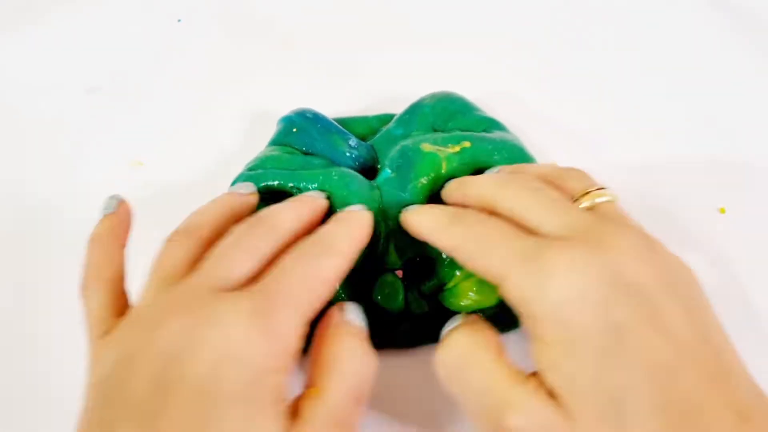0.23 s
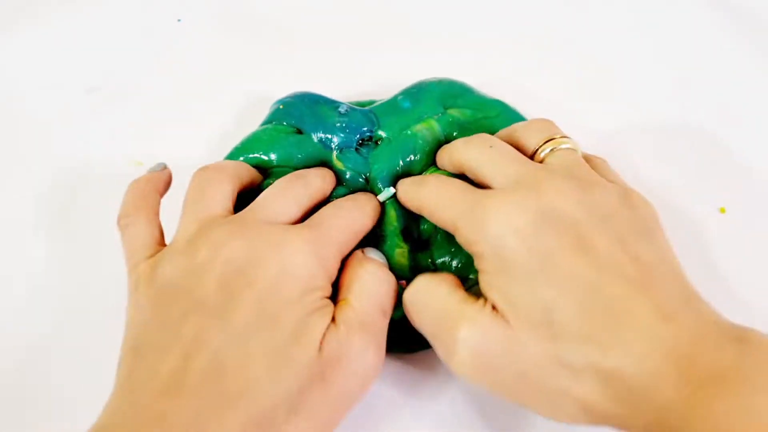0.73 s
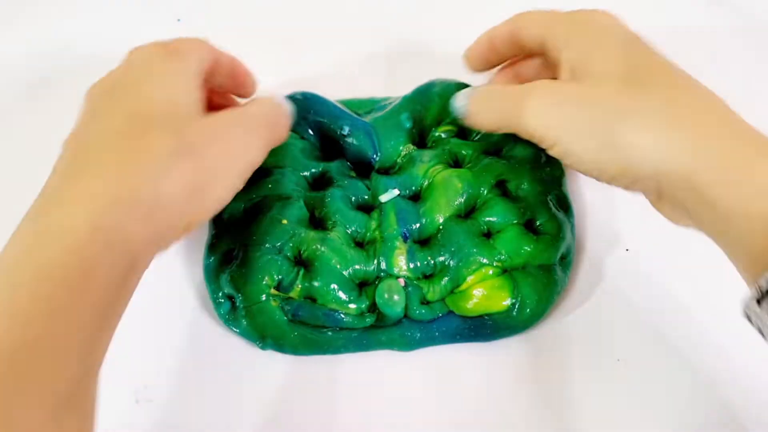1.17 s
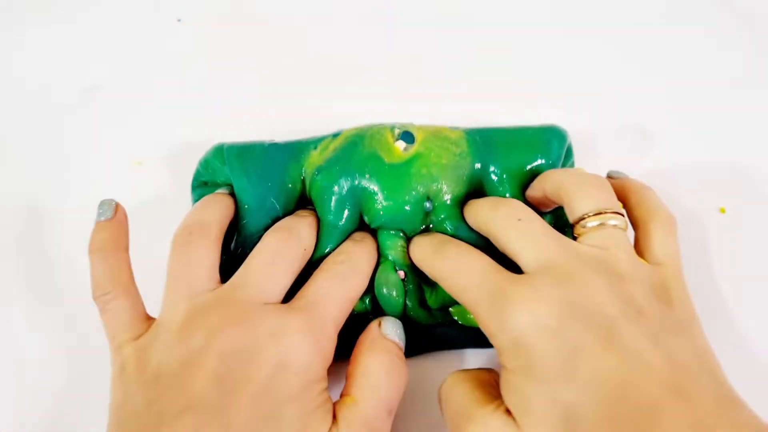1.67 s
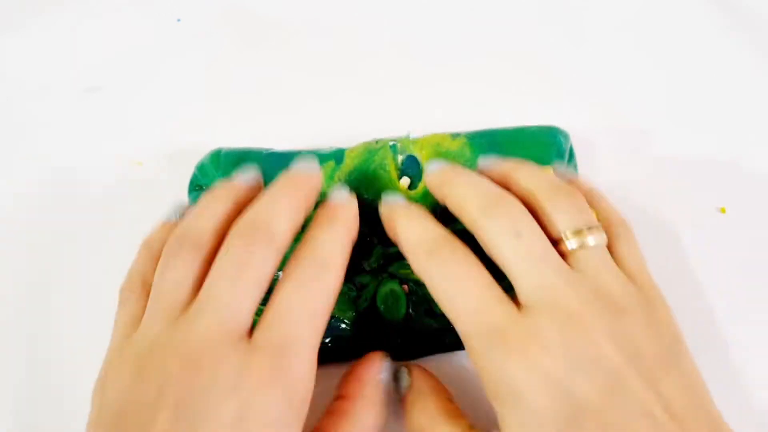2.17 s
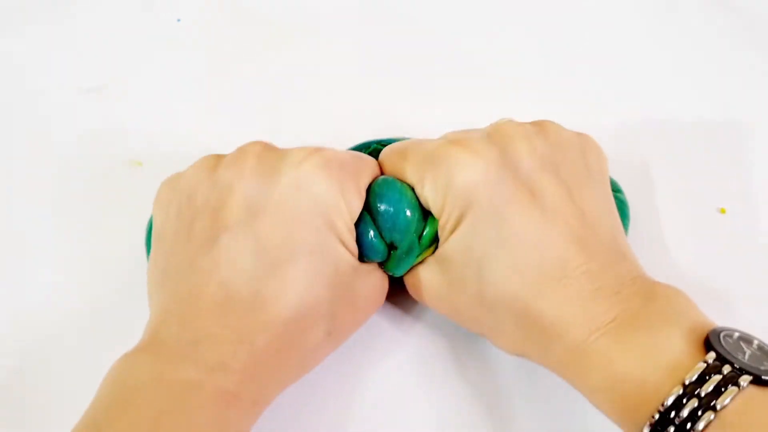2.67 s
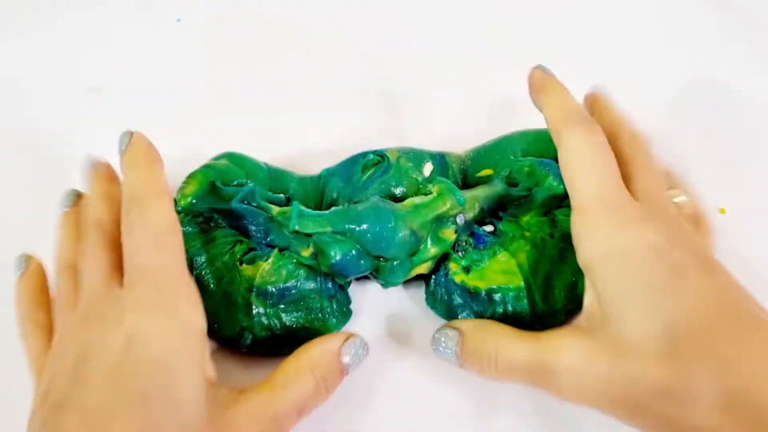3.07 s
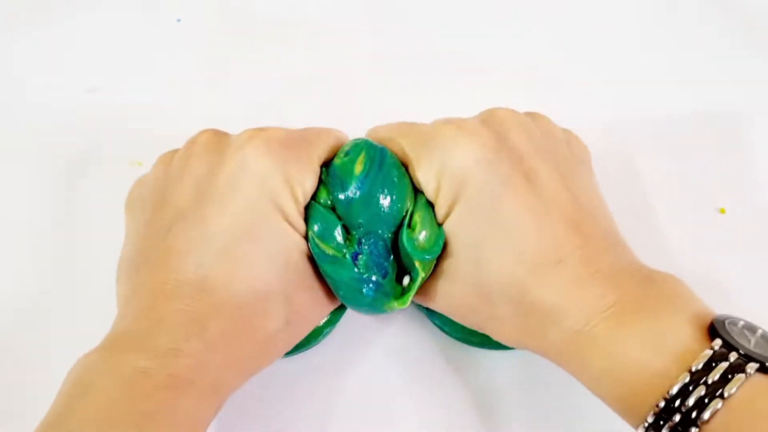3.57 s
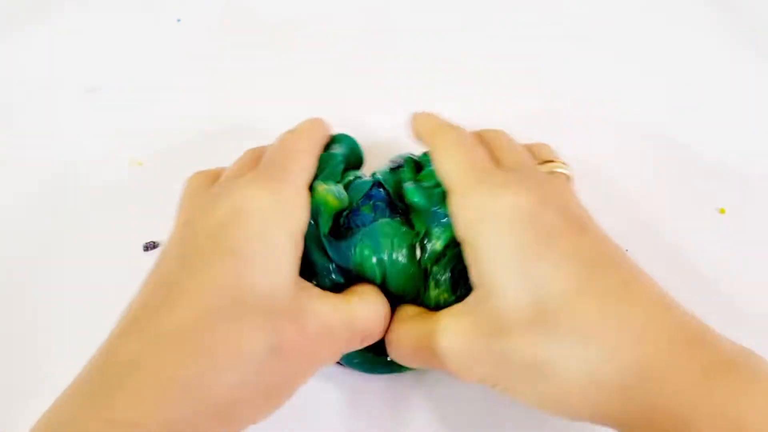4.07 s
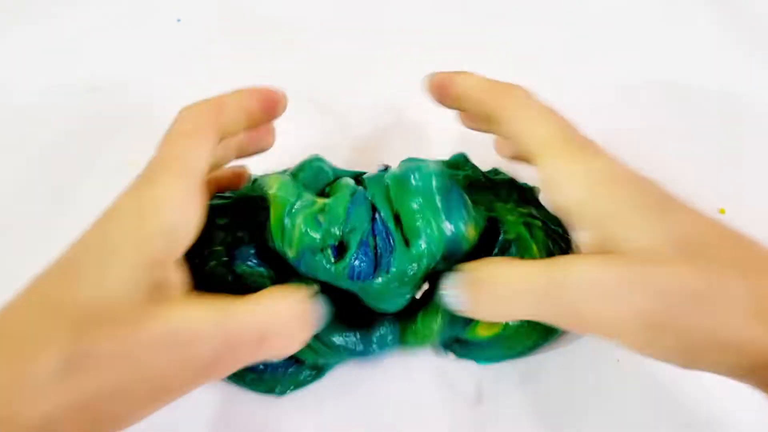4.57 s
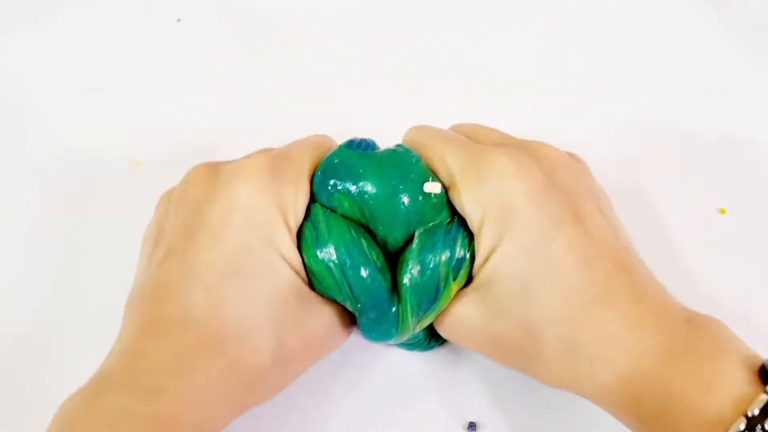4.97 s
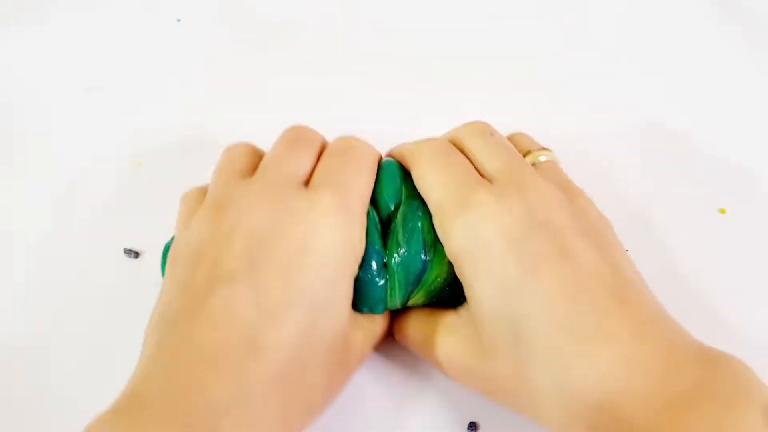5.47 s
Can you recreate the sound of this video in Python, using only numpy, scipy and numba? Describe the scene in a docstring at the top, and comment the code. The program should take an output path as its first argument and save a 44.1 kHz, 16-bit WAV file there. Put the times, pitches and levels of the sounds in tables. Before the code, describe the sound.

Hands poke, fold and squeeze wet slime up close, with isolated squelchy pops at first, then dense bursts of sharp crackles and snaps.

```python
"""Wet slime poked, folded and squeezed by two hands: swarms of short ringing bubbles follow the air flow of each stroke.
Thin films snap as filtered noise bursts; larger air pockets pop as damped, wobbling tones.
Pushes of the hands thud into the table as low damped sines.
The table and the space above it colour the crackle; a small, dry room adds short reflections and a faint hush."""
import sys
import numpy as np
from scipy import signal
from scipy.fft import rfft, irfft
from scipy.io import wavfile
from scipy.ndimage import uniform_filter1d, map_coordinates
from numba import njit

SR = 44100
rng = np.random.default_rng(int(sys.argv[2]) if len(sys.argv) > 2 else 0)


def bounce(signal):
    """Save signal as a 16-bit WAV file at the path given by the first command-line argument."""
    frames = np.transpose(np.atleast_2d(signal))
    limited = np.clip(frames, -1, 1)
    pcm = np.round(limited * 32767).astype(np.int16)
    wavfile.write(sys.argv[1], SR, pcm)


N = 251811
TIME = np.arange(N) / SR


def amp(db):
    """Decibels to gain."""
    return 10 ** (np.asarray(db) / 20)


def unit(x):
    """Scale to an rms of 1."""
    return x / np.sqrt(np.mean(x ** 2) + 1e-18)


def add(track, start_s, sound):
    """Mix a sound into the track."""
    i = int(np.clip(start_s * SR, 0, N - 1))
    track[i:i + len(sound)] += sound[:N - i]


def resonate(x, hz, width_hz):
    """One resonance, gain 1 at its centre."""
    return signal.lfilter(*signal.iirpeak(hz, hz / width_hz, fs=SR), x)


def colour(x, points):
    """Shape a spectrum by (Hz, dB) points, interpolated over log frequency."""
    hz, db = np.transpose(points)
    f = np.maximum(np.fft.rfftfreq(len(x), 1 / SR), 1)
    return irfft(rfft(x) * amp(np.interp(np.log(f), np.log(hz), db)), len(x))


# spectrum of the still room: hz, relative_level_db
HUSH_SPECTRUM = [(18, -29.5), (30, -4.5), (185, -1), (312, -10.5), (3150, -19), (5440, -4), (13900, -7.5),
                 (15000, -8)]


def hush(rms_db=-81.5):
    """Still room: steady coloured noise."""
    return amp(rms_db) * unit(colour(rng.standard_normal(N), HUSH_SPECTRUM))


def room(x, level_db=-13.5, t60_low_s=0.11, t60_high_s=0.07, split_hz=1500):
    """Dense, short reflections; the treble dies first."""
    t = TIME[:12000]
    noise = rng.standard_normal(len(t))
    low = signal.sosfilt(signal.butter(2, split_hz, fs=SR, output="sos"), noise)
    high = signal.sosfilt(signal.butter(2, split_hz, "high", fs=SR, output="sos"), noise)
    tail = low * amp(-60 * t / t60_low_s) - high * amp(-60 * t / t60_high_s)
    tail = tail * (t > .002)
    tail = tail / np.sqrt(np.sum(tail ** 2))
    return x + amp(level_db) * signal.fftconvolve(x, tail)[:N]


# fixed resonances of the table and the space above it: centre_hz, width_hz, level_db (before gain_db)
SPACE_MODES = [(244, 40, 3), (305, 60, -4), (695, 100, -3), (880, 90, -8), (1425, 160, -8), (3560, 450, -9),
               (6360, 900, -7), (8340, 600, -4), (13800, 2500, -7)]


def table_space(x, direct_db=-2.5, gain_db=2.0):
    """The crackle rings fixed resonances of the table and the space above it."""
    rings = sum(amp(db + gain_db) * resonate(x, hz, width_hz) for hz, width_hz, db in SPACE_MODES)
    return amp(direct_db) * x + rings


# every poke bottoms out this long after its start: a cavity and a deep pocket pop, the table thuds
BOTTOM_S = .025
# thud of each poke; level relative to its gurgle, before gain_db; length before stretch
TABLE_HZ, TABLE_DB, TABLE_S = 125, 7, 0.034
# hands pressing on the table: start_s, level_db (before gain_db), pitch_hz, length_s (before stretch)
TABLE_THUDS = [(0.23, -24.5, 41.8, 0.046), (0.266, -20, 56, 0.0077), (0.533, -21, 42.3, 0.064),
               (0.845, -26, 91, 0.051), (0.992, -22, 89, 0.014), (1.097, -20, 69, 0.028),
               (1.189, -29.5, 75, 0.014), (2.1296, -23, 44, 0.031), (3.136, -23, 42.5, 0.058),
               (3.7, -31, 65.5, 0.14), (3.811, -21.5, 72.9, 0.014), (4.0674, -22, 63.4, 0.019),
               (4.361, -32.5, 63, .028), (4.524, -22, 46.4, .032), (4.535, -22.5, 116, 0.043),
               (5.224, -30, 61.1, 0.056), (5.306, -29, 63, 0.034)]


def thuds(gain_db=-2, stretch=0.82, lead_s=.004):
    """A soft push rocks the table briefly, until the hands damp it."""
    out, t = np.zeros(N), TIME[:16384]
    pokes = [(start_s + BOTTOM_S, db + gurgle_db + TABLE_DB, TABLE_HZ, TABLE_S)
             for start_s, _, db, _, gurgle_db, *_ in POKES]
    for start_s, db, hz, length_s in pokes + TABLE_THUDS:
        age = t / (stretch * length_s / 2)
        envelope = age * np.exp((1 - age ** 2) / 2)  # peak 1 at age 1
        add(out, start_s - lead_s, amp(db + gain_db) * envelope * np.sin(2 * np.pi * hz * t))
    return out


# pops of each poke; pocket level relative to its gurgle, before gain_db; lengths before stretch
CAVITY_POP_S = .014
POCKET_HZ, POCKET_DB, POCKET_S = 232.1, 10, .018
# air pockets popping: start_s, level_db (before gain_db), pitch_hz (before glide and wobble),
# length_s (before stretch)
POCKET_POPS = [(0.4883, 0, 190, 0.0061), (1.0017, -9, 181, 0.0056), (1.961, -28, 359, 0.037),
               (1.982, -15, 269, 0.0076), (2.487, -13.5, 698, .017), (2.51, -16.5, 239, 0.02),
               (2.5575, -11.5, 768, 0.0098), (2.62, -23, 706, 0.016), (2.694, -13.5, 754, 0.0068),
               (2.778, -22, 1316, 0.0025), (2.786, -18, 827, 0.015), (2.833, -7.5, 1010, 0.0071),
               (2.856, -6.5, 292, 0.0091), (3.176, -22, 136, 0.016), (3.463, -22, 712, 0.018),
               (3.6485, -24.5, 735, 0.015), (3.705, -13.5, 824, 0.0033), (3.6704, -12.5, 1485, 0.0045),
               (3.6768, -16, 246, 0.0064), (3.729, -14, 249.4, 0.014), (3.7324, -15.5, 1240, 0.013),
               (4.0875, -9.5, 920, 0.0014), (4.13, -6, 542, 0.011), (4.1385, 3.5, 543, .0035),
               (4.1862, 1.5, 545, 0.0022), (4.201, -21.5, 1700, 0.005), (4.2563, -23, 240, 0.019),
               (4.4487, -5.5, 820, 0.0045), (4.503, -15, 240, 0.014), (4.9004, -12, 368, .01),
               (4.9277, -3.5, 1040, 0.002), (5.1847, -4.5, 850, 0.0076), (5.1988, -12.5, 230.5, 0.015),
               (5.5336, -4, 1340, 0.0011), (5.5657, -24, 688, 0.045), (5.591, -15, 857, 0.0072),
               (5.648, -21, 920, .0092)]


def pops(gain_db=-3, stretch=0.97, glide=0.014, overtone=1.47, overtone_db=-10):
    """An air pocket opens within a cycle and rings down; its soft wall wobbles the pitch and adds a second mode."""
    out, t = np.zeros(N), TIME[:8192]
    holes = [(start_s + BOTTOM_S, pop_db, cavity_hz, CAVITY_POP_S)
             for start_s, *_, pop_db, cavity_hz in POKES]
    pockets = [(start_s + BOTTOM_S, db + gurgle_db + POCKET_DB, POCKET_HZ, POCKET_S)
               for start_s, _, db, _, gurgle_db, *_ in POKES]
    for start_s, db, hz, length_s in holes + pockets + POCKET_POPS:
        age = t / (stretch * length_s)
        knots = rng.standard_normal(256)
        wobble = .08 * np.interp(t * hz / 2, np.arange(len(knots)), knots)  # a knot every two cycles
        turns = np.cumsum(hz * (1 + wobble + glide * (np.tanh(age) - .5))) / SR
        second = overtone * (1 + 0.11 * rng.standard_normal())
        ring = np.sin(2 * np.pi * turns)
        ring = ring + amp(overtone_db) * np.sin(2 * np.pi * second * turns)
        opening = 1 - np.exp(-turns / .5)
        add(out, start_s, amp(db + gain_db) * ring * opening * np.exp(-age ** 2))
    return out


# films snapping: start_s, level_db (before ring_db, tick_db), ring_hz, length_s (before stretch),
# bright_db (cut of the tick's spectrum up to 3.5 kHz)
FILM_SNAPS = [(0.1244, -17, 14300, 0.0047, 1), (0.353, -41.5, 6050, 0.00077, 15.5),
              (0.48, -17, 12500, 0.00059, 15), (0.809, -17.5, 6720, 0.0012, -14),
              (0.909, -47, 5970, 0.0064, 13), (0.951, -36, 14000, 0.0027, 11),
              (1.065, -25, 10000, 0.0087, -10), (1.0766, -19.5, 2850, 0.003, 0.5),
              (1.162, -26.5, 2740, 0.0019, -8.5), (1.221, -46, 3750, .0039, -13),
              (1.284, -46, 6300, 0.0026, -25), (1.3354, -42, 14220, 0.0043, 9),
              (1.761, -16, 13450, .0021, 0), (1.773, -17.5, 2460, 0.002, 2.5),
              (1.976, -49, 3000, 0.0066, 7.5), (2.075, -15, 13100, 0.0025, 1.5),
              (2.301, -45.5, 3500, 0.0053, -6), (2.3323, -22.5, 14100, 0.0011, 22),
              (2.376, -48, 13135, .0023, 6), (2.4077, -27, 7300, 0.0065, 49), (2.487, -22, 7000, .0027, 29),
              (2.513, -14, 6170, 0.0023, 40), (2.523, -18, 3820, 0.0012, -14),
              (2.5564, -9, 6460, 0.0011, -21), (2.619, -22.5, 12400, 0.0056, 12.5),
              (2.628, -20.5, 8250, .0025, 9), (2.6584, -10, 13600, 0.0027, 11),
              (2.721, -23.5, 1900, 0.0032, -8), (2.8294, -17, 3250, .0052, 25),
              (2.868, -34, 3680, .0019, -3.5), (2.8877, -27, 2980, 0.0092, 12.5),
              (3.296, -10.5, 6180, 0.00091, -38), (3.305, -14, 2470, 0.0026, -12),
              (3.363, -30, 14200, 0.0022, 21), (3.379, -15.5, 3350, 0.0072, -7),
              (3.408, -12, 6460, 0.00022, 0), (3.429, -19.5, 2380, 0.0032, 9.5),
              (3.4585, -22.5, 8160, 0.012, 5), (3.555, -22, 6300, 0.0031, -14),
              (3.857, -50.5, 3440, 0.0054, -2), (4.1845, -10, 3120, 0.0015, -3),
              (4.2369, -12, 15100, 0.0036, 0.5), (4.3206, -17, 12500, 0.0083, -10),
              (4.3292, -16, 2680, 0.0042, -11), (4.432, -15, 3220, 0.00085, -12),
              (4.438, -19, 6730, .0011, 4), (4.463, -27.5, 6500, .005, 11.5),
              (4.8447, -33.5, 4450, 0.002, -10), (4.8975, -8.5, 3250, 0.0012, -14),
              (4.927, -20, 3500, 0.0015, 15), (4.9512, -9, 13600, 0.0018, 10),
              (4.9666, -23.5, 4440, 0.01, 18.5), (4.981, -16.5, 13400, .0006, 0.5),
              (5.033, -12.5, 6300, 0.0026, -20.5), (5.084, -15.5, 14900, 0.012, 16.5),
              (5.201, -25.5, 2770, 0.018, 22), (5.551, -20.5, 13500, 0.0044, 6),
              (5.568, -11, 5750, 0.0025, -30), (5.605, -15.5, 13200, 0.0014, 14),
              (5.651, -26.5, 4030, 0.0026, 27)]


def snaps(ring_db=0, tick_db=-4, stretch=0.93, sharpness=3.1, rise_s=0.00023, spray_db=-21, spray_s=0.003):
    """A film tears in a noise burst with a faint spray; it rings a little cavity and gives a broad tick."""
    out, t = np.zeros(N), TIME[:4096]
    spray = amp(spray_db) * np.exp(-t / spray_s)
    rise = 1 - np.exp(-t / rise_s)
    for start_s, db, hz, length_s, bright_db in FILM_SNAPS:
        envelope = np.exp(-t / (stretch * length_s))
        tear = rng.standard_normal(len(t)) * (envelope + spray) * rise
        ring = resonate(resonate(tear, hz, hz / sharpness), hz, hz / sharpness)
        # a thinner film gives a brighter tick; the padding gives its onset room
        padded = np.pad(tear, 64)
        tick = colour(padded, [(200, -17.5 - bright_db), (900, 0.5 - bright_db), (3500, -bright_db),
                               (10000, -4.0), (14000, -18.5)])
        size = amp(db) * np.sqrt(np.mean(envelope ** 2))
        add(out, start_s, size * amp(ring_db) * unit(ring))
        add(out, start_s - 64 / SR, size * amp(tick_db) * unit(tick))
    return out


@njit
def bubbles(start, hz, cycles, size, glide):
    """Each bubble rings for a few cycles; its pitch climbs as the cavity opens."""
    out = np.zeros(N)
    for k in range(len(start)):
        life = cycles[k] * SR / hz[k]  # samples
        phase = 0.
        for i in range(min(int(life), N - start[k])):
            phase += 2 * np.pi * hz[k] / SR * (1 + glide * i / life)
            out[start[k] + i] += size[k] * np.exp(-6 * i / life) * np.sin(phase)
    return out


def swarm(per_s, low_hz, high_hz, mean_cycles, spread_db, slope_db_per_octave):
    """Bubbles bursting at random, many faint and a few strong, up to a size limit."""
    when, pitch, life, strength, sign = rng.random((int(per_s * N / SR), 5)).T
    octave = pitch * np.log2(high_hz / low_hz)
    excess = np.minimum(-np.log(1 - strength), 3.6)
    size = np.sign(sign - .5) * amp(spread_db * excess + slope_db_per_octave * octave)
    start = (when * N).astype(np.int64)
    return bubbles(start, low_hz * 2 ** octave, mean_cycles * (.5 + life), size, .25)


def folds(x, cavity_db=9, cavity_octaves=0.52, slit_db=9, slit_octaves=0.12, slit_open_s=0.012, hollow_db=3.2):
    """Moving folds colour the crackle: a wide cavity, a narrow slit and many small passing hollows."""
    f, t, z = signal.stft(x, SR, nperseg=512, noverlap=384)
    octave = np.log2(np.maximum(f, 50))[:, None]

    def bump(centre, width):
        """A resonance around a centre given as log2 of its pitch."""
        return np.exp(-.5 * ((octave - centre) / width) ** 2)

    # each stroke gives the cavity a new shape, which holds until the next
    starts, cavity_hz = np.transpose(sorted((start_s, hz) for start_s, *_, hz in POKES + SQUEEZES))
    held = np.log2(cavity_hz)[np.maximum(np.searchsorted(starts, t) - 1, 0)]
    db = cavity_db * bump(uniform_filter1d(held, size=5), cavity_octaves)
    # each snapping film leaves a slit that rings at its pitch and closes again
    snap_s, _, slit_hz, _, _ = np.transpose(FILM_SNAPS)
    age_s = t - snap_s[:, None]
    slit_open = (age_s > 0) * np.exp(-np.abs(age_s) / slit_open_s)
    db = db + slit_db * bump(np.log2(slit_hz), slit_octaves) @ slit_open
    # hollows a third of an octave wide come and go 45 times a second
    where = np.broadcast_arrays(3 * (octave - np.log2(50)), 45 * t)
    db = db + hollow_db * map_coordinates(rng.standard_normal((32, 300)), where, order=2)
    return signal.istft(z * amp(db), SR, nperseg=512, noverlap=384)[1][:N]


def steady(x, span_s):
    """Hold the mean power at 1: the flow of air, not chance, sets the loudness of a swarm."""
    span = max(int(span_s * SR), 2)
    power = uniform_filter1d(uniform_filter1d(x ** 2, span), span)
    return x / np.sqrt(np.abs(power) + 1e-9)


def stroke(length_s, swell_db, attack_s, fall_db_per_s, tail_db, tail_db_per_s):
    """Air flow of one stroke: quick rise, swelling or sagging hold, fast fall, faint tail as the slime relaxes."""
    t = TIME[:32768]
    after_s = np.maximum(t - length_s, 0)
    held = np.minimum(t / attack_s, 1) ** 2 * amp(swell_db * np.minimum(t / length_s, 1))
    return held * (amp(-fall_db_per_s * after_s) + amp(tail_db - tail_db_per_s * after_s))


def add_flow(power, start_s, db, envelope):
    """Add the power of one stroke."""
    add(power, start_s, (amp(db) * envelope) ** 2)


# fingertips poking in: start_s, push_s, level_db (before layer gains), fizz_db and gurgle_db (relative to level_db),
# cavity_pop_db (before the pops' gain_db), cavity_hz
POKES = [(0.113, 0.037, -20.5, -3.5, 1.5, -7, 724), (0.455, 0.035, -30, 6, 8, -16.5, 740),
         (0.777, 0.036, -25.5, -0.5, 3, -16.5, 672), (1.047, 0.035, -20, 0, -3.5, -15, 1372),
         (1.733, 0.034, -22, -1, -0.5, -4.5, 692), (2.052, 0.023, -23.5, 4.5, -3, -11, 721)]
# hands gripping, folding and peeling: start_s, attack_s, length_s, level_db (before layer gains),
# swell_db (over the length), fizz_db and gurgle_db (relative to level_db), cavity_hz
SQUEEZES = [(0.0, 0.0007, 0.0096, -48, -4, 0.5, -21, 700), (0.899, 0.011, 0.13, -57.5, -1.5, -1, 5.5, 850),
            (0.983, 0.023, 0.021, -37.5, 1, -11, 0.5, 520), (1.148, 0.009, 0.17, -49, -15, 5, 10.5, 1213),
            (1.34, .01, 0.089, -79.5, -6.5, 16.5, -10, 952), (1.944, .012, 0.058, -57, 1, 1, 21.5, 517),
            (2.045, 0.0081, 0.0064, -56, -0.5, 10.5, -2, 890),
            (2.076, 0.014, 0.047, -45.5, -2, -8.5, 5, 575), (2.285, 0.048, 0.1, -59.5, -4, 5, 5, 1360),
            (2.403, 0.0077, 0.052, -41.5, -2.5, 0, 7.5, 1020),
            (2.479, 0.011, 0.036, -31.5, 4.5, 2, -7.5, 660),
            (2.541, 0.013, 0.048, -14, -12.5, -5.5, -16, 2000),
            (2.607, 0.014, 0.028, -20.5, -4.5, 0, -17.5, 1420),
            (2.663, 0.038, 0.043, -22, -3.5, -11, -3.5, 620),
            (2.773, 0.0077, 0.039, -33.5, -3.5, -30, -19, 1150),
            (2.814, 0.017, 0.05, -17, -1.5, -2, -9, 1270), (2.874, 0.0072, 0.029, -20.5, -8, -4, -2, 1280),
            (2.905, 0.043, 0.054, -35, 1.5, 3.5, 1.5, 1530), (3.124, 0.02, 0.1, -54, 15.5, -9, 0, 930),
            (3.284, 0.011, 0.077, -29.5, -17.5, 0, 1.5, 1930),
            (3.367, 0.0092, 0.081, -37.5, -2.5, 5, -3, 1850), (3.449, 0.0073, 0.025, -24, 1.5, 7, -22, 600),
            (3.482, 0.0045, 0.092, -37, -8.5, 0, -12, 1044),
            (3.634, 0.039, 0.13, -26, 1.5, -1.5, -1.5, 1410),
            (3.757, 0.0073, 0.052, -38.5, -14, 8, 7.5, 1320),
            (3.949, 0.034, 0.097, -33, -10.5, -6.5, 3, 520), (4.08, .003, 0.015, -25.5, -2.5, -27, -5, 946),
            (4.117, 0.016, 0.029, -16.5, -3, -20, -7, 555),
            (4.151, 0.0091, 0.025, -28, -2.5, -6.5, -1, 517),
            (4.178, .006, 0.04, -22, -4.5, -11.5, -7.5, 1520),
            (4.228, .005, 0.049, -28, -9, -3.5, -2, 1120), (4.279, 0.014, 0.032, -28.5, -2, -14, -10, 970),
            (4.312, 0.004, 0.057, -34, -4.5, -3, -15, 1860),
            (4.401, 0.017, 0.017, -45.5, 2.5, -4, -9.5, 816), (4.426, 0.008, 0.11, -20, -9, -2, -2, 890),
            (4.562, 0.011, 0.013, -48, -7, 13, 9, 983), (4.689, 0.021, 0.082, -46, -4.5, -3.5, -6, 653),
            (4.824, 0.041, 0.053, -44.5, 4, 5.5, 0, 534), (4.885, 0.014, 0.045, -21.5, -11, 5.5, -10, 525),
            (4.952, 0.0091, 0.096, -41, 17.5, 1.5, -4.5, 1416),
            (5.07, 0.0075, 0.1, -40, 1, -0.5, -13, 1804), (5.131, 0.013, 0.054, -27, 14, -5.5, -15, 922),
            (5.191, 0.0082, 0.039, -24.5, -10.5, 2.5, 5.5, 917), (5.28, .016, 0.18, -86, 8, -1, 25.5, 800),
            (5.457, 0.027, 0.037, -43, 0.5, -9, -4.5, 1590), (5.511, 0.019, 0.045, -41.5, 10, 0, -32, 1550),
            (5.556, 0.021, 0.044, -20, -7.5, 1, -38, 1170),
            (5.636, 0.012, 0.047, -34, -1.5, -8.5, -13, 1200)]


def flow():
    """Strength of squelch, fizz and gurgle: the powers of all strokes add, each layer with its own fall."""
    wet, fine, deep = np.zeros((3, N))
    for start_s, push_s, db, fizz_db, gurgle_db, *_ in POKES:
        add_flow(wet, start_s, db, stroke(
            push_s, 0, attack_s=0.016, fall_db_per_s=561.5, tail_db=-50, tail_db_per_s=82))
        add_flow(fine, start_s, db + fizz_db, stroke(
            push_s, 0, attack_s=0.018, fall_db_per_s=850, tail_db=-43.5, tail_db_per_s=83.5))
        add_flow(deep, start_s, db + gurgle_db, stroke(
            push_s, 0, attack_s=.018, fall_db_per_s=478, tail_db=-26.5, tail_db_per_s=129))
    for start_s, attack_s, length_s, db, swell_db, fizz_db, gurgle_db, _ in SQUEEZES:
        add_flow(wet, start_s, db, stroke(
            length_s, swell_db, attack_s, fall_db_per_s=678, tail_db=-44, tail_db_per_s=140))
        add_flow(fine, start_s, db + fizz_db, stroke(
            length_s, swell_db, attack_s, fall_db_per_s=703, tail_db=-40, tail_db_per_s=120.5))
        add_flow(deep, start_s, db + gurgle_db, stroke(
            length_s, swell_db, attack_s, fall_db_per_s=469.5, tail_db=-32, tail_db_per_s=130.5))
    return np.sqrt([wet, fine, deep])


# colour of the fine wet crackle: hz, relative_level_db
FIZZ_SPECTRUM = [(880, -24), (1500, -14), (2080, -9.5), (2860, -3), (3090, -3.5), (3550, -3), (4420, -4.5),
                 (6180, -3), (7760, -8.5), (8400, -6), (9470, -13), (11900, -4.5), (13400, -4.5),
                 (15100, -7.5), (16000, -28.5)]


def squelch(settle_s=0.07):
    """Squeezing drives air out through the slime: fizz from fine bubbles, gurgle from deep pockets."""
    middle, fine, deep = flow()
    wet = folds(swarm(per_s=900, low_hz=542, high_hz=2450, mean_cycles=8, spread_db=5.0, slope_db_per_octave=1.0))
    fizz = swarm(per_s=6500, low_hz=1940, high_hz=17100, mean_cycles=5, spread_db=3.0, slope_db_per_octave=3)
    fizz = folds(colour(fizz, FIZZ_SPECTRUM))
    gurgle = swarm(per_s=290, low_hz=104.1, high_hz=378, mean_cycles=13, spread_db=5, slope_db_per_octave=4.5)
    rumble = swarm(per_s=310, low_hz=30.2, high_hz=133, mean_cycles=1.2, spread_db=6, slope_db_per_octave=2.5)
    # single larger bubbles stand out with their own pitch
    blips = swarm(per_s=70, low_hz=890, high_hz=5000, mean_cycles=18, spread_db=3, slope_db_per_octave=1.5)
    # the heavy mass lags behind the fingers and settles slowly
    settle = np.exp(-1 / (settle_s * SR))
    sway = signal.lfilter([1 - settle], [1, -settle], deep)
    out = steady(wet, span_s=0.014) * middle * amp(-2.0)
    out += steady(fizz, span_s=0.053) * fine * amp(-1.0)
    out += steady(gurgle, span_s=0.029) * deep * amp(-4.5)
    out += unit(blips) * middle * amp(-10.5)
    out += steady(rumble, span_s=0.034) * sway * amp(-14)
    return out


def scene():
    """The crackle rings the table, and the room answers briefly; both channels carry the same sound."""
    crackle = table_space(squelch() + snaps())
    mono = room(crackle + pops()) + thuds() + hush()
    return np.array([mono, mono])


def record(dry, peak=.92, top_hz=15700):
    """The peaks are clipped just under full scale; then the recorder cuts the top."""
    low_pass = signal.ellip(10, .2, 80, top_hz, fs=SR, output="sos")
    return signal.sosfilt(low_pass, np.clip(dry, -peak, peak))


dry = scene()
out = record(dry)
bounce(out)
```